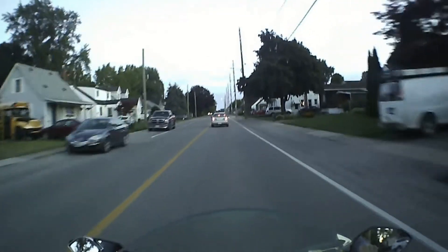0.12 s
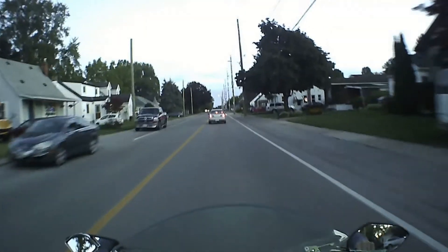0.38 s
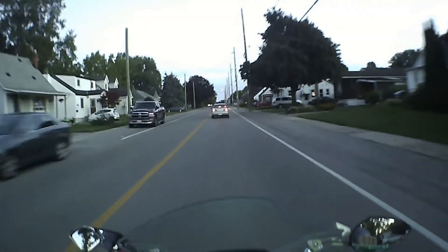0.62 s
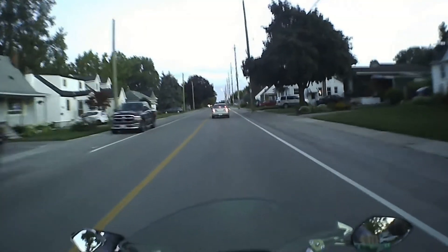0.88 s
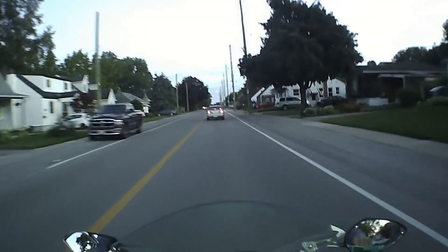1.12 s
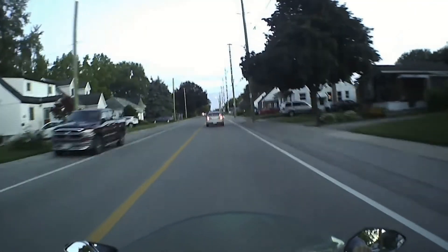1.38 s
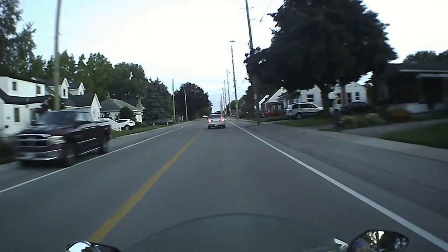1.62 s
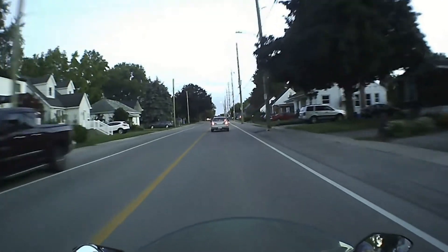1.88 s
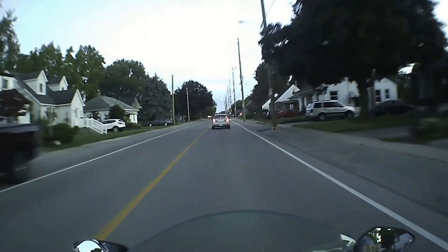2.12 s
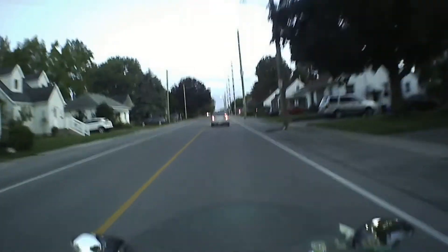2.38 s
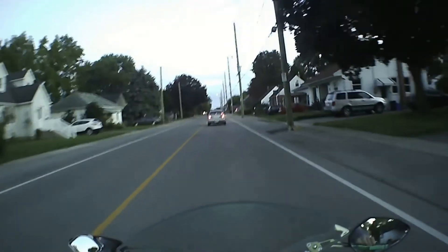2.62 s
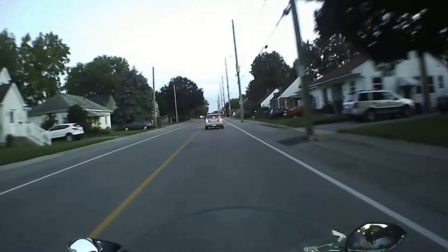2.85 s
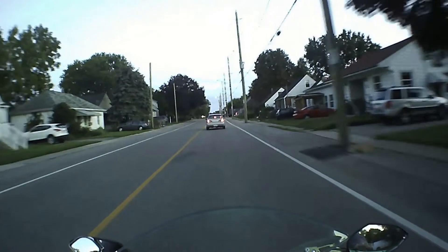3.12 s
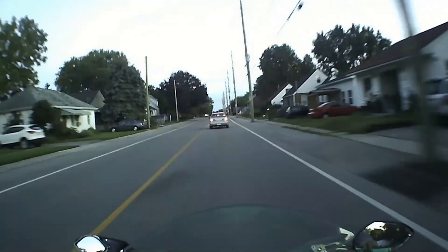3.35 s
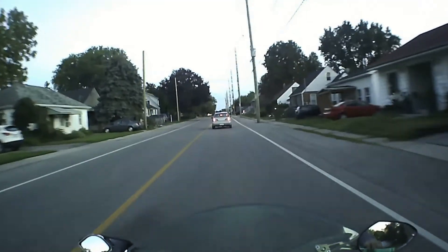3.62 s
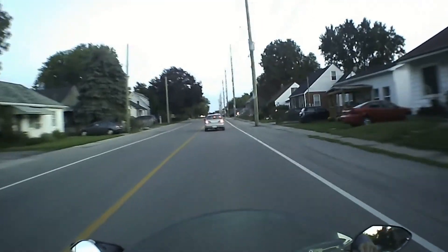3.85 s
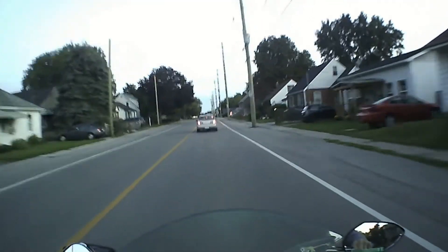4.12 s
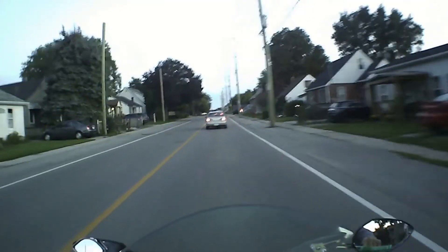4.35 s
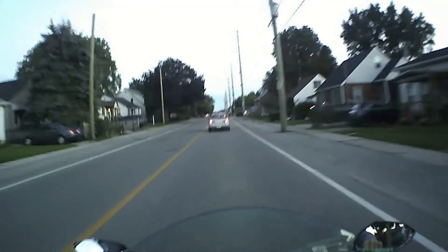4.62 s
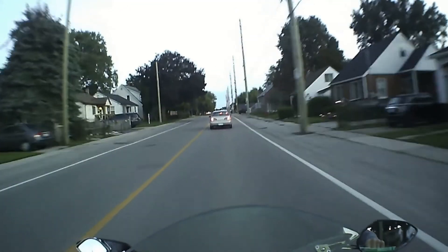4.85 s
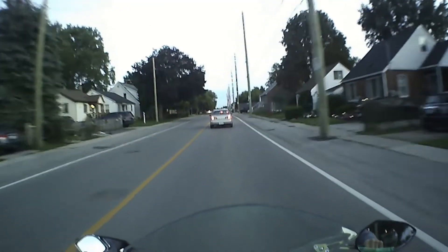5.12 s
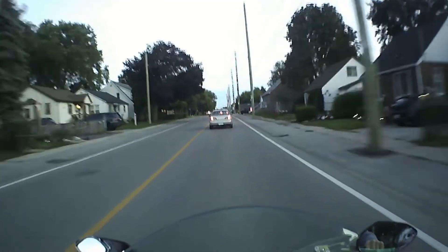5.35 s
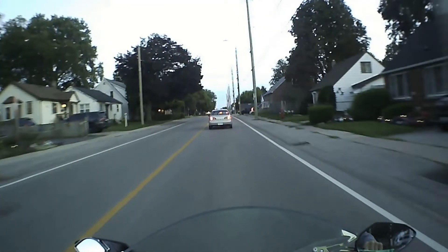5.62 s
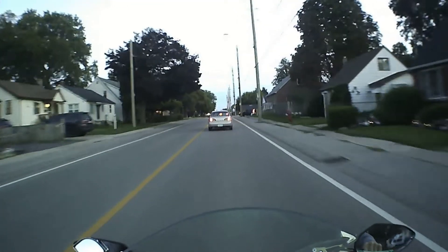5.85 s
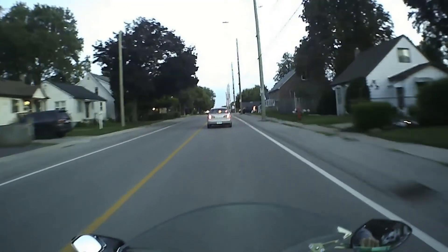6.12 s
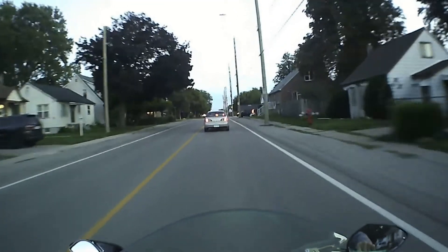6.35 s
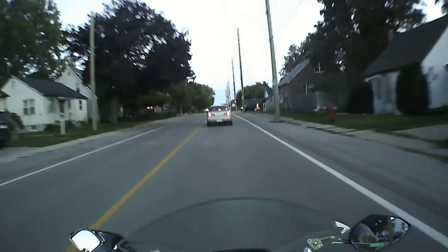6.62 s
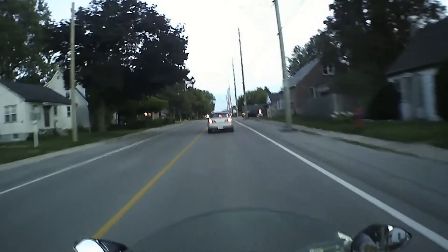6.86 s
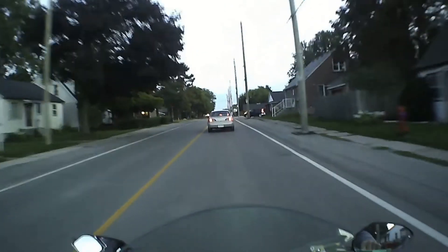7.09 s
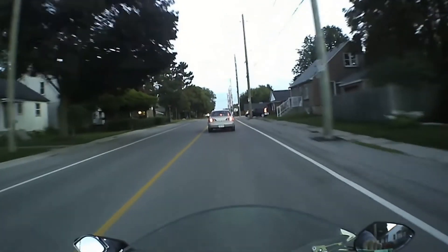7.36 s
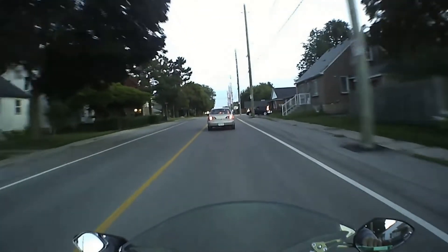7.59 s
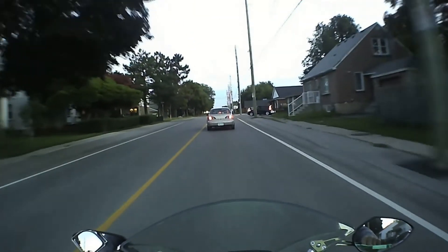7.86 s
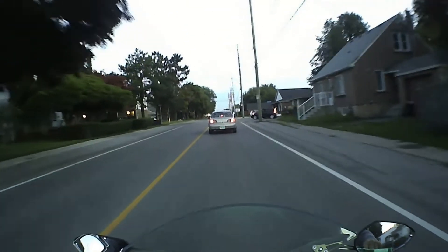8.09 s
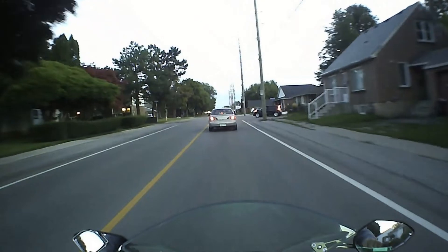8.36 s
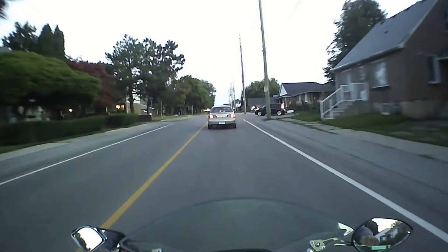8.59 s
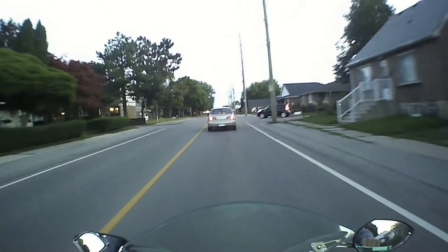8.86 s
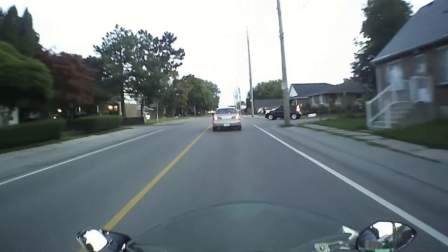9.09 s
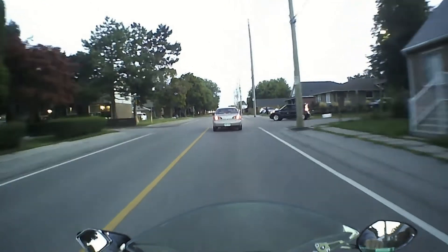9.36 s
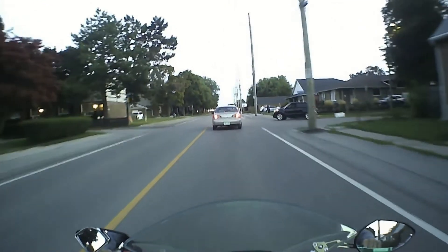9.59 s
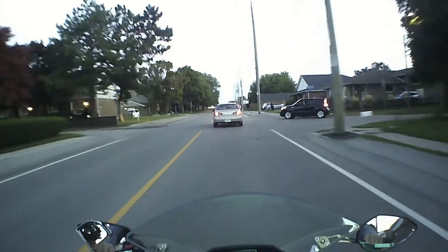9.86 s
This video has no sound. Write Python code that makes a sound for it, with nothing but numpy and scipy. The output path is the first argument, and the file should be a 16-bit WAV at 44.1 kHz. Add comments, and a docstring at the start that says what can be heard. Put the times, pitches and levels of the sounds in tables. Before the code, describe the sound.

A small microphone on an electric motorcycle riding along a town road is battered by slipstream. Deep rumbling and irregular thumps dominate, with a fluttering airy hiss that drops out briefly and a steady dull roar of tyres beneath. The wind swells to its strongest around the middle, then weakens over the last two seconds, where a few faint dry ticks appear.

```python
"""A small microphone rides on an electric motorcycle along a town road.
From the start, slipstream eddies thump and rumble on the port, summed from coloured noise and pressure swings;
a fast jet over its edge, fluttering noise, hisses and drops out in lulls, above a noise roar of tyres and
slipstream that partly follows the gusts and the jet. The slipstream is strongest near 4.5 s, weak from about 8 s;
faint dry ticks, short noise bursts, come after 9.3 s. The housing colours everything; capsule noise lies beneath."""
import sys
import numpy as np
from scipy import signal
from scipy.fft import rfft, irfft, next_fast_len
from scipy.io import wavfile
from scipy.ndimage import uniform_filter1d

SR = 44100
rng = np.random.default_rng(int(sys.argv[2]) if len(sys.argv) > 2 else 0)


def how_loud(loudness_db):
    """Turn decibels into a plain amplitude multiplier (0 dB gives 1, 20 dB gives 10)."""
    steps = np.asarray(loudness_db, float) / 20
    return 10 ** steps


def wrap_up_sound(samples):
    """Save the sound to the file named by the first command line argument, as 16-bit audio."""
    columns = np.atleast_2d(samples).T
    # keep every value between -1 and 1, then stretch to whole-number steps
    tamed = np.clip(columns, -1, 1)
    steps = np.round(tamed * 32767).astype(np.int16)
    wavfile.write(sys.argv[1], SR, steps)


N = 439671  # samples

# strength of the slipstream, which each source follows in its own proportion: t/s, level/dB
FLOW = [(0.0, -2), (0.91, 2), (1.81, -1.8), (2.72, 1.6), (3.63, 3), (4.53, 4), (5.44, 3.5), (6.34, 2),
        (7.25, 0.9), (8.16, -3), (9.06, -2.5), (9.97, -3)]

# eddy sizes large, middle, small: pitch f/Hz, level/dB ahead of the housing, level per slipstream level dB/dB
EDDIES = [(33, -21.5, 0.27), (115, -28.5, 0.5), (500, -35.5, 0.39)]
# gusts that swell the buffeting, in full at their own pitch: t/s, half-length/ms, rise/dB, eddy pitch f/Hz
GUSTS = [(0.269, 45, 3, 65), (0.294, 11, 5, 600), (0.589, 17, 4.5, 300), (0.923, 34, 9, 200),
         (1.586, 17, 4, 600), (1.756, 26, 4.5, 350), (1.866, 170, 0.5, 25), (2.235, 14, 1, 600),
         (2.509, 15, 7, 500), (2.745, 6.6, 9.5, 600), (2.913, 57, 4, 65), (3.228, 36, 3, 200),
         (3.362, 250, 1.5, 600), (3.502, 28, 7, 25), (3.62, 14, 7, 300), (3.655, 23, 5, 900),
         (3.843, 8.6, 11, 600), (4.056, 8.3, 12.5, 115), (4.19, 8.8, 13.5, 300), (4.237, 6, 7.5, 400),
         (5.158, 19, 3, 115), (5.278, 12, 9.5, 350), (5.403, 7.5, 9, 200), (5.787, 16, 6, 200),
         (6.051, 15, 3.5, 600), (6.415, 19, 8, 115), (6.904, 25, 8, 350), (7.387, 10, 7, 200),
         (7.545, 35, 5, 250), (7.747, 99, 3.5, 300), (8.057, 32, 7.5, 115), (8.095, 45, 5, 900),
         (8.486, 26, 4.5, 600), (8.541, 13, 10, 150), (9.109, 190, 2.5, 600), (9.234, 12, 6.5, 600),
         (9.718, 140, 2, 65), (9.89, 6.5, 8, 500)]
# calms between them, in full at their own pitch: t/s, half-length/ms, fall/dB, eddy pitch f/Hz
CALMS = [(0.404, 25, 3.5, 600), (0.668, 21, 6, 115), (0.748, 150, 7, 40), (1.058, 98, 4, 600),
         (1.307, 18, 13, 25), (1.502, 30, 4.5, 610), (1.561, 80, 9, 65), (2.29, 110, 3.5, 65),
         (2.634, 26, 11, 24.8), (3.008, 12, 19, 115), (3.053, 110, 4, 196), (3.702, 58, 3.5, 25),
         (3.961, 120, 4, 115), (4.29, 17, 12, 200), (4.45, 30, 5, 25), (5.059, 17, 11, 115),
         (5.512, 32, 8, 600), (5.572, 83, 7, 25), (5.692, 29, 5.5, 200), (5.872, 11, 6, 200),
         (5.976, 25, 7, 200), (6.335, 26, 14, 30), (6.335, 24, 8, 300), (6.67, 120, 8.5, 115),
         (6.839, 22, 7.5, 65), (7.014, 11, 9, 600), (7.254, 190, 4, 115), (7.448, 24, 4, 65),
         (7.623, 19, 7.5, 62), (7.947, 22, 11, 25), (8.236, 30, 8, 25), (8.431, 39, 14, 65),
         (8.655, 29, 11, 200), (8.95, 23, 11, 115), (9.279, 13, 5, 600), (9.409, 38, 7, 25)]
REACH_OCTAVES = 1.24  # how far from its pitch a gust or calm is felt
# relative spectra of the large, middle and small eddies: f/Hz, density level/dB
LARGE = [(5, -29), (14, 3), (24, 8.5), (38, 5), (60, -9), (110, -22), (300, -46.5), (3000, -120)]
MIDDLE = [(8, -51.5), (25, -4.5), (60, 5.5), (120, -1), (220, -10.5), (330, -18.5), (520, -30.5),
          (3000, -96)]
SMALL = [(30, -52), (100, -5), (230, -2), (460, -6.5), (1000, -11), (2000, -19), (5000, -33.5),
         (16000, -90)]
# bands in which the eddy and jet levels hold, low and high f/Hz
LARGE_HZ, MIDDLE_HZ, SMALL_HZ, HISS_HZ = (18, 60), (60, 220), (220, 1200), (4500, 10000)
EDGE_RAD = 1.07  # lean of a core's swing: 0 a crest, pi / 2 a rising edge

# single strong eddies: t/s, signed pressure/full scale ahead of the housing, passage time scale/ms
THUMPS = [(0.235, 0.38, 6.4), (0.25, -0.46, 6.5), (0.466, 0.32, 8.1), (0.586, -0.3, 4.8), (0.595, 0.4, 10),
          (0.891, -0.1, 0.56), (0.915, -0.2, 2.7), (1.111, -0.3, 4.4), (1.236, 0.35, 8.6), (1.82, 0.34, 9),
          (1.944, 0.26, 8.8), (1.994, 0.4, 9.3), (2.483, 0.4, 6), (2.499, -0.34, 3.2), (2.627, 0.31, 2.8),
          (2.69, -0.22, 1.5), (2.937, -0.37, 8), (3.049, -0.17, 5), (3.065, 0.32, 8), (3.188, 0.47, 4.2),
          (3.212, -0.33, 8), (3.225, 0.33, 7), (3.256, 0.29, 4), (3.286, -0.32, 3.4), (3.322, -0.23, 1.4),
          (3.455, 0.3, 3.7), (3.572, 0.23, 6), (3.613, -0.19, 2), (3.617, 0.57, 4.5), (3.83, -0.22, 3.3),
          (3.842, 0.64, 7.2), (4.057, 0.22, 4.5), (4.179, -0.87, 2.95), (4.519, -0.23, 2.3),
          (4.197, 0.41, 2.9), (4.549, -0.65, 2.8), (4.552, 0.59, 1.6), (4.727, 0.19, 4), (4.785, 0.33, 5),
          (4.834, 0.38, 9), (4.847, -0.61, 1.45), (5.159, -0.2, 3.4), (5.259, -0.31, 7),
          (5.272, 0.041, 7.1), (5.331, -0.23, 1.7), (5.39, 0.3, 3.5), (5.422, -0.38, 6.3),
          (5.481, -0.24, 0.58), (5.55, 0.27, 1.9), (5.775, 0.41, 3.5), (5.807, 0.18, 0.61),
          (5.922, 0.099, 4.5), (6.118, 0.24, 5), (6.208, -0.23, 3.2), (6.213, 0.19, 3.2),
          (6.408, -0.19, 2.5), (6.51, 0.22, 4.8), (6.761, 0.49, 8.8), (6.916, 0.24, 4.4),
          (7.109, -0.32, 1.9), (7.518, -0.4, 1.65), (7.379, -0.3, 2.5), (8.041, 0.58, 4.8),
          (8.08, 0.21, 2.4), (8.531, -0.14, 2), (9.029, -0.22, 0.88), (9.104, 0.51, 7.2),
          (9.136, -0.31, 1.4), (9.247, 0.33, 4), (9.665, 0.28, 3.1), (9.705, 0.26, 2.5), (9.846, 0.42, 6.3)]

# relative spectrum of the jet: f/Hz, density level/dB
HISS = [(100, -36), (400, -7.5), (1200, 1), (3000, -2), (6000, -8.5), (10000, -17.5), (16000, -26)]
# surges of the jet: t/s, half-length/ms, rise/dB
SURGES = [(1.891, 9.5, 4.5), (2.04, 5.2, 4.5), (2.225, 15, 5.5), (2.508, 7, 4), (2.744, 3.3, 4.5),
          (3.367, 5.4, 3), (3.482, 5.3, 5), (3.522, 30, 4), (3.896, 29, 3), (4.156, 20, 3.5), (4.58, 20, 2),
          (5.806, 5, 5), (6.061, 21, 2.5), (6.176, 12, 1), (6.47, 17, 2.5), (6.974, 13, 10),
          (7.438, 72, 2.5), (7.762, 6.5, 8), (8.211, 6.9, 9), (8.975, 10, 4.5), (9.164, 22, 2.5),
          (9.463, 39, 2.5), (9.792, 4, 7), (9.575, 7, 4), (9.932, 3.9, 7.5)]
# lulls of the jet: t/s, half-length/ms, fall/dB
LULLS = [(0.399, 18, 11), (0.873, 47, 8.5), (1.372, 8.3, 4), (1.681, 39, 1), (1.766, 8.9, 7), (2.0, 79, 3),
         (2.01, 5.1, 11), (2.664, 7.2, 7), (2.968, 7.3, 5), (3.222, 6.5, 21), (3.262, 4.5, 8),
         (3.447, 17, 4), (3.781, 36, 3), (4.011, 17, 6), (4.29, 28, 5.5), (4.435, 37, 7.5), (4.789, 6.6, 8),
         (4.914, 4.9, 12), (5.203, 4.9, 8), (5.657, 15, 7), (5.782, 7, 4), (6.343, 17, 20),
         (6.924, 8.7, 11), (6.989, 69, 9.5), (7.747, 65, 7.5), (7.887, 18, 7), (8.171, 17, 12),
         (8.206, 38, 5.5), (8.241, 10, 10), (8.421, 11, 7), (8.531, 31, 6), (8.68, 9.8, 10), (8.765, 18, 4),
         (8.875, 7.3, 11), (9.112, 8, 19), (9.214, 12, 7), (9.264, 27, 9), (9.299, 8, 7), (9.379, 6, 10),
         (9.552, 5.4, 7), (9.723, 7.9, 10)]
JET_DB, JET_PER_FLOW = -53.5, 0.93  # level heard through the housing, and dB per dB of slipstream
JET_TOP_HZ, TOP_PER_FLOW = 6340, 0.56  # the top starts here; its extra dB per dB of slipstream

# relative spectrum of the roar: f/Hz, density level/dB
ROAR = [(60, -38), (200, -26), (500, 0.5), (1000, -1.5), (1800, -2), (3500, -7.5), (7000, -33),
        (15000, -33)]
ROAR_DB, ROAR_GUST_HZ, ROAR_PER_GUST = -39, 700, 0.12  # mid level; it swells with gusts of the small eddies

# faint dry ticks in the treble: t/s, level/dB ahead of the gain TICK_DB and the resonance
TICKS = [(9.3255, -36), (9.3367, -36), (9.3495, -41), (9.3714, -46), (9.7113, -47), (9.9314, -41)]
TICK_HZ, TICK_WIDTH_HZ, TICK_MS, TICK_DB = 6800, 3300, 0.5, 16

# housing and microphone response: f/Hz, level/dB
HOUSING = [(600, 1.5), (1150, -0.5), (1550, 0.5), (2150, -7.5), (3300, -6), (3950, -1), (4500, -6),
           (5000, -3.5), (5500, -9), (7000, -9.5), (9200, -11.5), (10300, -15.5), (12400, -9), (13200, -15),
           (15600, -20)]
PREAMP_DB = -63  # capsule noise, rms ahead of the housing
OFFSET = -0.0154  # constant shift, of full scale

COARSE = 64  # samples between the points of a level curve


def buffeting():
    """Three sizes of eddy; bursts are shared, since large eddies carry the small ones along."""
    large_db, middle_db, small_db = (eddy_db(*size) for size in EDDIES)
    burst = walk(36)
    cores = vortex_cores(70)
    large = turbulence(LARGE, LARGE_HZ, 2.0 * burst, 0.53 * cores, 0.057)
    middle = turbulence(MIDDLE, MIDDLE_HZ, 3.0 * burst + 1.5 * walk(70), 0.69 * cores, 0.12)
    small = turbulence(SMALL, SMALL_HZ, 2.0 * burst + 3.64 * walk(260), 0.3 * cores, 0.056)
    # crests of the large eddies are sharper than their troughs
    squared = large ** 2
    large = large + 0.15 * (squared - uniform_filter1d(squared, SR // 10))
    return how_loud(large_db) * large + how_loud(middle_db) * middle + how_loud(small_db) * small


def vortex_cores(per_s):
    """Scattered cores that strike all eddy sizes at once; turning their phase leans each swing onto an edge."""
    chance = rng.random((2, N))
    strikes = chance[0] < per_s / SR
    strength = np.minimum(np.log(1 / (1 - chance[1])), 2.6) - 0.4
    cores = strikes * strength * np.sqrt(SR / per_s)
    turned = signal.hilbert(cores, next_fast_len(N))[:N]
    return np.cos(EDGE_RAD) * turned.real + np.sin(EDGE_RAD) * turned.imag


def turbulence(points, band, flicker_db, cores, even_s):
    """Flickering noise plus vortex cores, coloured; swells longer than even_s are held back; rms 1 in the band."""
    noise = rng.standard_normal(N) * how_loud(flicker_db)
    x = colour(noise + cores, points)
    k = int(even_s * SR)
    power = uniform_filter1d(uniform_filter1d(x ** 2, k), k)
    x = x / np.sqrt(power + 0.16 * x.var()) ** 0.87
    return x / band_rms(x, *band)


def eddy_db(hz, db, per_flow):
    """Level of one eddy size: it follows the slipstream; gusts and calms reach it less the further their pitch lies."""
    def reach(rows):
        total = 0
        for s, ms, step_db, at_hz in rows:
            nearness = np.exp(-0.5 * (np.log2(hz / at_hz) / REACH_OCTAVES) ** 2)
            total = total + step_db * nearness * bell(s, ms)
        return total

    return db + per_flow * curves(FLOW)[0] + per_sample(reach(GUSTS) - reach(CALMS))


def thumps():
    """A vortex core passing the port: a sharp swing of pressure with broad shoulders."""
    out, span = np.zeros(N), np.arange(-2048, 2048)
    for s, pressure, ms in THUMPS:
        u = span / SR / (ms / 1000)  # time in units of the passage
        swing = 1 - 0.69 * u ** 2 + 0.47 * np.sign(pressure) * u
        out[int(s * SR) + span] += pressure * swing / (1 + u ** 2) ** 2
    return out


def jet():
    """Air rushing over the port's edge: noise that flutters as a whole, so its bands come and go together."""
    slow = walk(33)
    # the squared term makes deep collapses commoner than surges
    flutter_db = 0.27 * slow - 0.27 * slow ** 2
    flutter_db = flutter_db + 3.04 * np.tanh(1.4 * walk(100)) + 1.85 * walk(1500)
    hiss = colour(rng.standard_normal(N) * how_loud(flutter_db), HISS)
    # the top of the jet brightens with the slipstream
    top = signal.sosfilt(signal.butter(2, JET_TOP_HZ, "high", fs=SR, output="sos"), hiss)
    hiss = hiss + (how_loud(TOP_PER_FLOW * curves(FLOW)[0]) - 1) * top
    return how_loud(jet_db()) * hiss / band_rms(colour(hiss, HOUSING), *HISS_HZ)


def jet_db():
    """Level of the jet: it follows the slipstream, surges briefly and drops out in the lulls."""
    def steps(rows):
        return sum(db * bell(s, ms) for s, ms, db in rows)

    return JET_DB + JET_PER_FLOW * curves(FLOW)[0] + per_sample(steps(SURGES) - steps(LULLS))


def roar():
    """Roar of tyres and slipstream: coloured, wavering noise that partly follows the gusts and the jet."""
    hiss_db = jet_db()
    waver_db = 1.14 * walk(5.5) + 0.42 * walk(33)
    x = colour(rng.standard_normal(N) * how_loud(waver_db), ROAR)
    from_jet_db = 0.21 * (hiss_db - hiss_db.mean())
    from_gusts_db = ROAR_PER_GUST * eddy_db(ROAR_GUST_HZ, 0, 0)
    return how_loud(ROAR_DB + from_jet_db + from_gusts_db) * x / x.std()


def ticks():
    """Short bright bursts of noise that die at once, rung through a broad resonance twice."""
    out, span = np.zeros(N), np.arange(256)
    decay = np.exp(-span / SR / (TICK_MS / 1000))
    for s, db in TICKS:
        noise = np.sign(rng.standard_normal(256))
        out[int(s * SR) + span] += how_loud(db + TICK_DB) * noise * decay
    ring = signal.iirpeak(TICK_HZ, TICK_HZ / TICK_WIDTH_HZ, SR)
    return signal.lfilter(*ring, signal.lfilter(*ring, out))


def capsule_noise():
    """Steady white noise of the microphone capsule."""
    return how_loud(PREAMP_DB) * rng.standard_normal(N)


def colour(x, points):
    """Shape a signal by (Hz, dB) points joined on a log-frequency axis; its ends are mirrored."""
    hz, db = np.transpose(points)
    edge = 8192
    size = next_fast_len(N + 2 * edge)
    f = np.maximum(np.arange(size // 2 + 1) * SR / size, 1)
    gain = how_loud(np.interp(np.log(f), np.log(hz), db))
    spectrum = rfft(np.pad(x, edge, "reflect"), size)
    return irfft(spectrum * gain, size)[edge:edge + N]


def band_rms(x, lo_hz, hi_hz):
    """Rms of the part between two frequencies."""
    size = next_fast_len(N)
    band = rfft(x, size)[int(lo_hz * size / SR):int(hi_hz * size / SR)]
    return np.sqrt(2 * (np.abs(band) ** 2).sum() / size / N)


def walk(rate):
    """Random levels held 1 / rate s and slewed twice; spread 1."""
    k = int(SR / rate)
    held = rng.standard_normal(N)[np.arange(N) // k]
    w = uniform_filter1d(uniform_filter1d(held, k), k)
    return w / w.std()


def curves(table):
    """Columns of a table after its times, one value per sample."""
    s, *columns = np.transpose(table)
    return [np.interp(np.arange(N) / SR, s, c) for c in columns]


def bell(s, ms):
    """A smooth rise and fall of height 1 around a moment, on the coarse grid."""
    return np.exp(-0.5 * ((np.arange(0, N, COARSE) / SR - s) / (ms / 1000)) ** 2)


def per_sample(coarse):
    """From the coarse grid to one value every sample."""
    return np.interp(np.arange(N), np.arange(0, N, COARSE), coarse)


def scene():
    """All sources at the single microphone."""
    return (buffeting() + thumps() + jet() + roar() + ticks())[None]


def low_pass(x):
    """Removes everything above the highest recorded frequency."""
    return signal.sosfilt(signal.butter(12, 15610, fs=SR, output="sos"), x)


def record(dry):
    """Capsule noise, the housing's colour, peaks rounded near full scale and a small constant offset."""
    x = colour(dry[0] + capsule_noise(), HOUSING)[None]
    rounded = 1.083 * np.tanh(x / 1.326) + OFFSET
    # the first and last 100 samples fade softly
    fade = np.clip(np.minimum(np.arange(N), N - 1 - np.arange(N)) / 100, 0, 1)
    mix = rounded * fade ** 2 * (3 - 2 * fade)
    return low_pass(mix)


dry = scene()
out = record(dry)
wrap_up_sound(out)
```